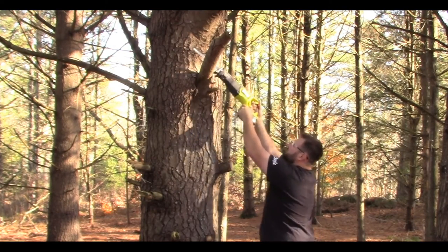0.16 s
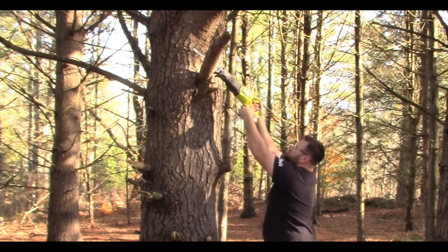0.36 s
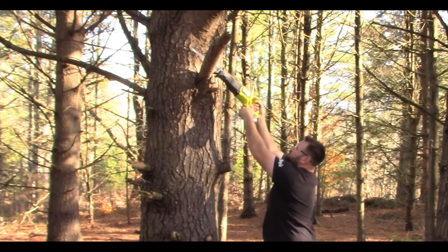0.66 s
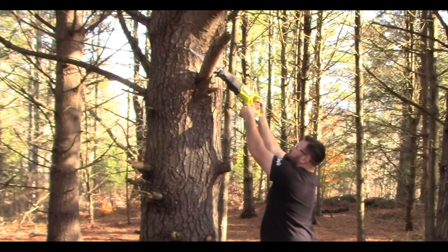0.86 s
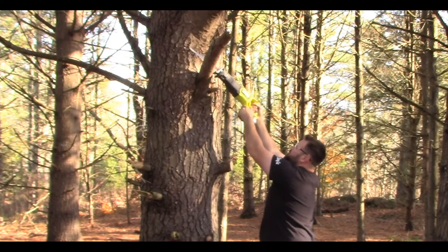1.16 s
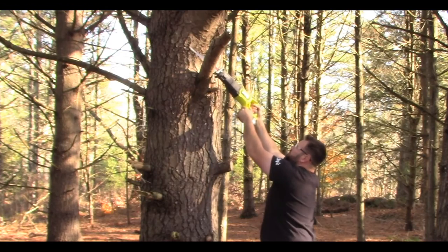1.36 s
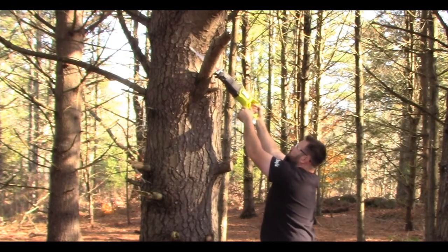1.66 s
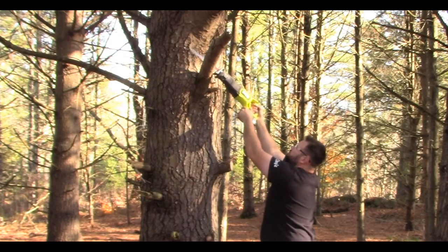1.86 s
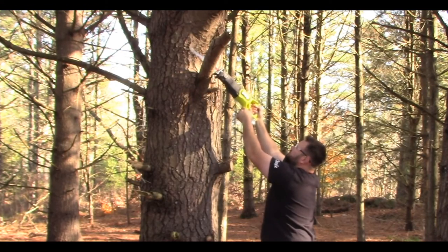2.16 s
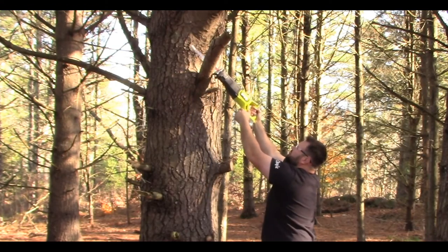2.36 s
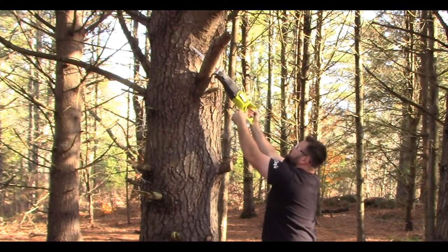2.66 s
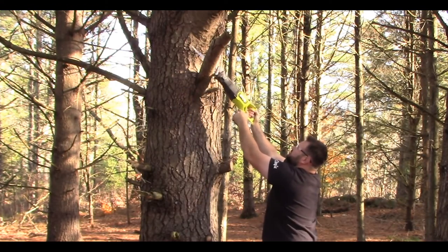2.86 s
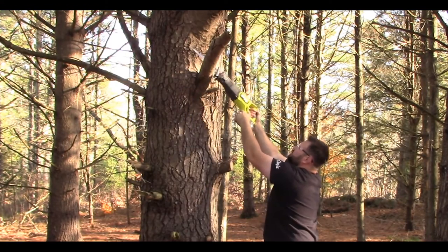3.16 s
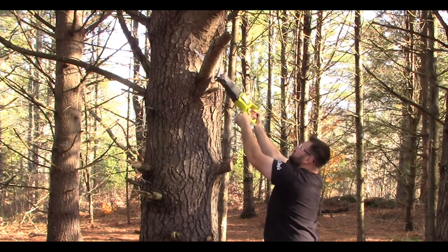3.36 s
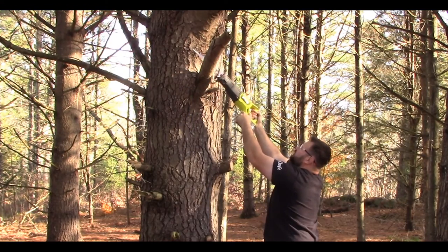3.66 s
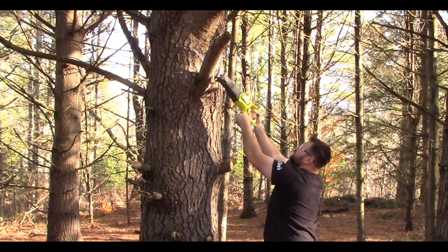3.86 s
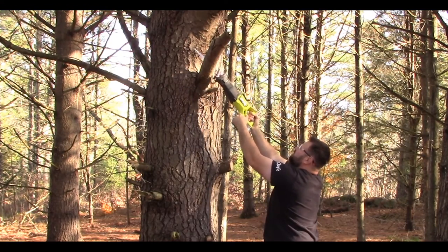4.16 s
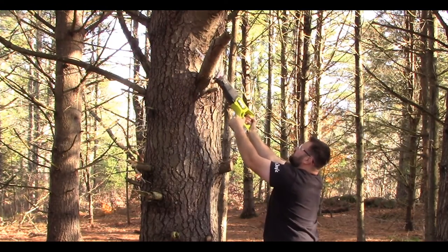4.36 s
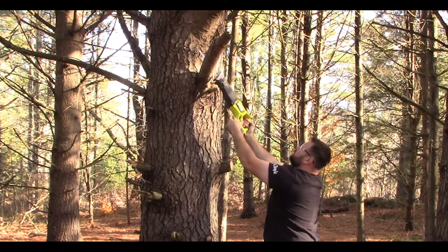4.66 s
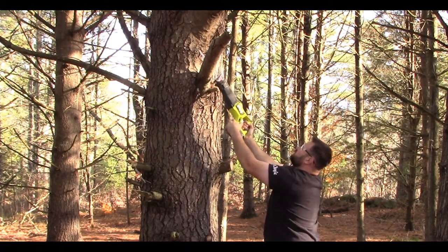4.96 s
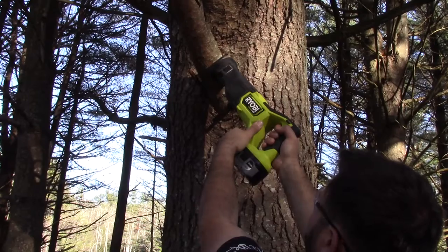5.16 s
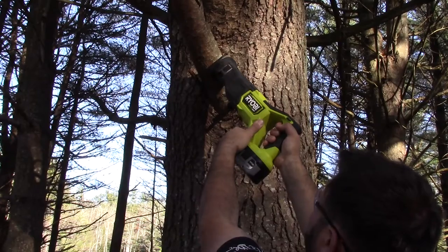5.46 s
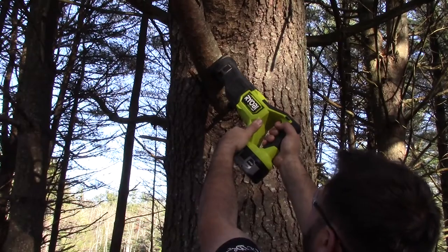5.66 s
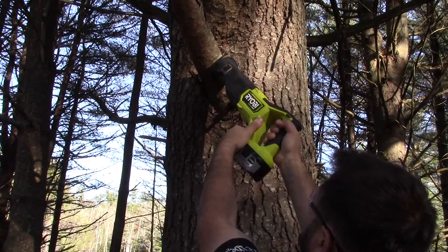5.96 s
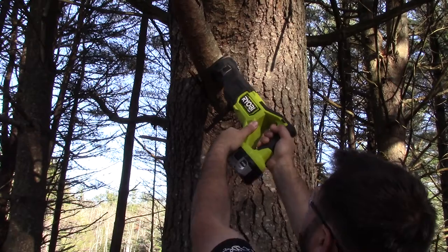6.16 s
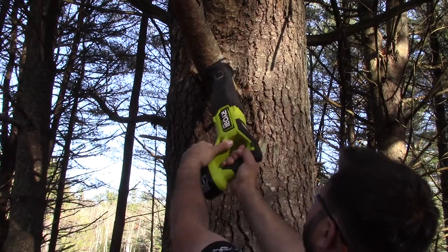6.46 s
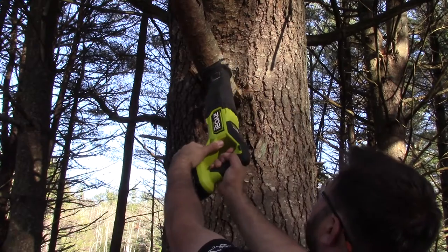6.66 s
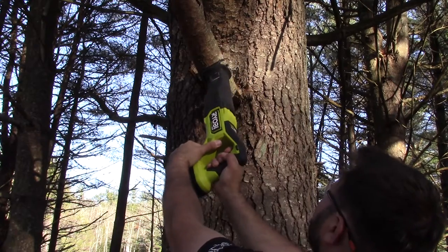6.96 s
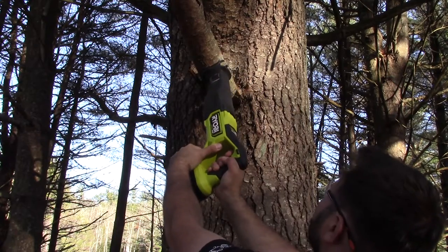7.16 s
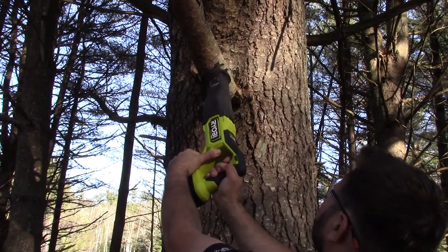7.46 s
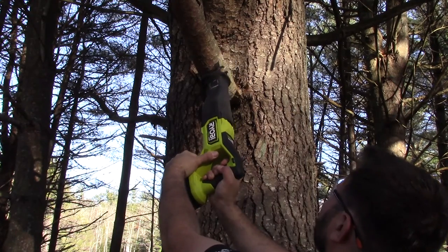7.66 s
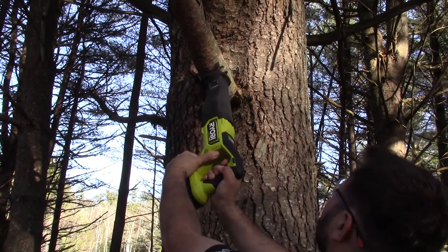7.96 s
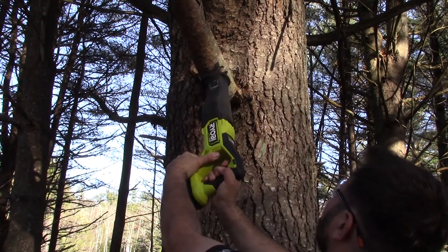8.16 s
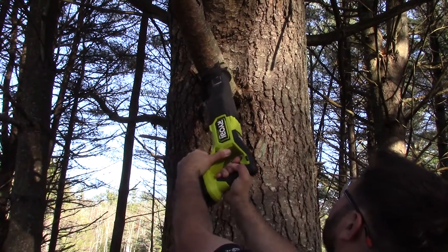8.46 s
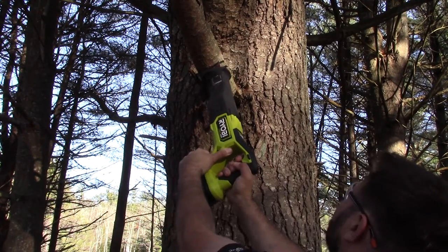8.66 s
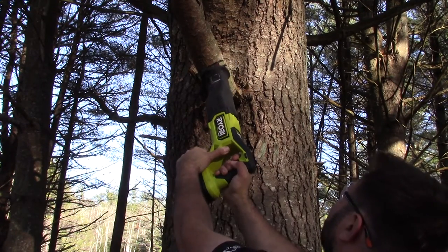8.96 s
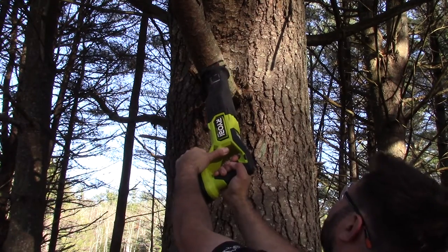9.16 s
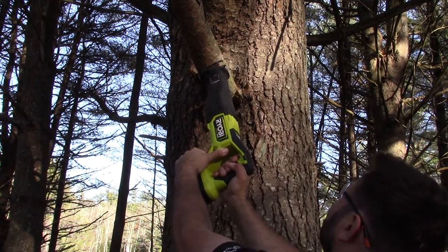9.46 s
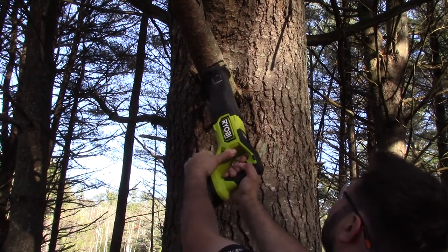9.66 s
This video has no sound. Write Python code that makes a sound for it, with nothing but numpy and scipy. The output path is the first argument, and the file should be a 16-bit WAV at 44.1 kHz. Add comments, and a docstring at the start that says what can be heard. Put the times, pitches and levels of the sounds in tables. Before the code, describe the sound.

A cordless reciprocating saw starts up and cuts steadily through a fresh tree limb, with fast rattling hammering, motor whine and rasping teeth.

```python
"""A fast, rattling hammer with a rasp on top: a cordless reciprocating saw cuts a fresh pine limb in a
quiet wood, first from afar, then from close by. One crank drives it all: the blade carrier knocks at both
ends of its stroke, the guide rattles, the gears sing between the knocks, the motor fan whines and the
teeth rasp. Load in the cut sags the speed. The cut has four stages: entry and deep in the limb (far),
then with the saw held flat and tilted steep (close)."""
import sys
import numpy as np
from scipy import signal
from scipy.fft import rfft, irfft
from scipy.io import wavfile

SR = 44100
rng = np.random.default_rng(int(sys.argv[2]) if len(sys.argv) > 2 else 0)


def wav_record(signal):
    """Record a signal, one row per channel, as 16-bit PCM in the file named by sys.argv[1]."""
    frames = np.transpose(np.atleast_2d(signal))
    bounded = np.clip(frames, -1, 1)
    # unit amplitude maps onto the largest positive 16-bit level
    quanta = np.round(bounded * 32767).astype(np.int16)
    wavfile.write(sys.argv[1], SR, quanta)


N = 432180
T = np.arange(N) / SR


def knocks(turns, outer, inner, lean_db, lead_turns=0.06115, ring_hz=1500, ring_width_hz=330):
    """The slack in the drive slaps shut at each end of the stroke; the outer blow rings the case longer."""
    # tone of the gear case: freq_hz, gain_db
    case_eq = [(200, -37), (400, -27.5), (700, -12.5), (1150, -11), (1300, -8), (1430, 1), (1620, -0.5),
               (1760, -5), (1900, -22), (2800, -43.5), (6000, -64)]
    pole = np.exp((2j * np.pi * ring_hz - np.pi * ring_width_hz) / SR)
    outer_clicks = strike(turns + lead_turns - outer, jitter_s=0.00031, spread_db=1)
    outer_ring = signal.lfilter([1], [1, -pole], outer_clicks).real
    inner_clicks = strike(turns + lead_turns - inner, jitter_s=0.00034, spread_db=1.5)
    share = 1 / (1 + amp(-2 * lean_db))  # the outer knock's part of the power
    return np.sqrt(share) * colour(outer_ring, case_eq) + np.sqrt(1 - share) * colour(inner_clicks, case_eq)


def rattle(angle, force_db, grip, loose=0.85, count=28, close_s=5.045):
    """Shoe, guide and teeth catch at the same places in every stroke; loose chatter fills the gaps."""
    # tone of the rattle from afar and from close by: freq_hz, gain_db
    far_eq = [(60, -34.5), (160, -19), (290, -16.5), (390, -4.5), (520, -4), (660, -2), (900, 1),
              (1200, -1.5), (1700, 6.5), (1920, -11.5), (2200, -13), (2500, -18), (2950, -38),
              (6000, -49.5)]
    close_eq = [(60, -38.5), (170, -26.5), (300, -19.5), (430, -2.5), (530, -6.5), (670, -1.5), (850, -6),
                (1200, -0.5), (1600, 5), (1920, -12), (2200, -16.5), (2500, -14), (2950, -32.5),
                (6000, -41)]
    places = (np.arange(count) + rng.random(count)) / count
    catches = sum(rng.choice([-1, 1]) * strike(angle - p, jitter_s=.00009, spread_db=1.5) for p in places)
    slap = strike(angle + 0.013, jitter_s=0.00025, spread_db=-0.5)  # the shoe hits the bark once a stroke
    chatter = (grip * evened(catches) + loose * rng.standard_normal(N)) / np.hypot(grip, loose)
    drive = chatter * amp(force_db) + 0.18 * evened(slap)
    return np.where(T < close_s, amp(1.2) * colour(drive, far_eq), amp(0.8) * colour(drive, close_eq))


def buzz(angle, speed, scatter_rad=0.97, slip_turns=0.0012, swell_db=1.5, hop=200):
    """Each stroke's jolt drives a comb of harmonics; they swell as they slide into resonances."""
    # resonances of housing and limb: centre_hz, width_hz, entry_db, deep_db, flat_db, steep_db
    body = [(109, 90, -42, -51, -44, -47), (210, 56, -47, -44, -45.5, -45.5),
            (368, 43, -53, -33.5, -41, -47), (440, 70, -34, -32.5, -29.5, -33),
            (492, 30, -41, -33, -46, -50), (548, 54, -31.5, -36.5, -44, -49),
            (613, 43, -39, -28.5, -24.5, -28), (686.3, 51, -33, -28.5, -24, -27),
            (737, 40, -41, -31, -36, -29), (837, 39, -31, -40, -33.5, -29), (930, 95, -35, -35.5, -39, -35)]
    angle = angle + slip_turns * wander(20)
    swells = [amp(swell_db * wander(3)) for _ in range(5)]
    modes = [(hz, width, amp(by_stage(db)[::hop])) for hz, width, *db in body]
    comb = np.zeros(N)
    for k in range(2, 24):
        pitch_hz = k * speed[::hop]
        power = sum((peak / (1 + (2 * (pitch_hz - hz) / width) ** 2)) ** 2 for hz, width, peak in modes)
        gain = np.interp(T, T[::hop], np.sqrt(power)) * swells[k % len(swells)]
        comb += gain * np.cos(2 * np.pi * k * angle + scatter_rad * rng.standard_normal())
    return np.sqrt(2) * np.minimum(speed / 40, 1) ** 4 * comb


def gears(turns, outer, inner, level_db, crown_teeth, drag_rad=1.8, waver_rad=0.13, slack_turns=0.077):
    """The teeth sing while loaded, fall behind through each half stroke and let go at the reversal."""
    since, split = (turns - outer) % 1, inner - outer
    half_stroke = np.where(since < split, since / split, (since - split) / (1 - split))
    contact = abs(np.sin(np.pi * half_stroke)) ** 0.42 * amp(0.32 * wander(80))
    from_parting = (since + 0.053 + .5) % 1 - .5  # they part longest just before the outer knock
    contact *= 1 - np.exp(-(from_parting / slack_turns) ** 2)
    mesh = 2 * np.pi * crown_teeth * turns - drag_rad * half_stroke + waver_rad * wander(47)
    gear_eq = [(600, 3.5), (1400, -1.5), (1800, -4.5), (1950, -12), (2200, -14), (4000, -44.5)]
    return amp(level_db) * colour(contact * np.sin(mesh), gear_eq)


def motor(turns, inner, gear_ratio, blades, grip, fan_db, spin_up, sway_rad=0.056, flutter_rad=0.024):
    """Fan whine and overtones of a shaft that each stroke slows and frees again."""
    # motor overtones: shaft_multiple, entry_db, deep_db, flat_db, steep_db
    partials = [(12, -48, -52, -48, -53), (16, -46.5, -43.5, -50, -42), (18, -45.5, -54, -45.5, -48),
                (19, -55, -50, -59.5, -50), (20, -47, -50, -48.5, -48), (24, -45, -54, -49, -45.5),
                (28, -54, -60, -53, -50), (32, -51, -54, -52, -67), (39, -58, -56, -58, -58),
                (40, -60, -58, -49.5, -48)]
    crank = 2 * np.pi * (turns - inner)
    lurch = sway_rad * np.cos(crank) + 0.034 * np.sin(2 * crank)
    shaft = 2 * np.pi * turns * gear_ratio + lurch + flutter_rad * wander(43)
    fan = grip * amp(fan_db + .5 * wander(33)) * np.sin(blades * shaft)
    shaft = shaft + (0.01 + .06 * (1 - grip)) * wander(85)  # a bouncing saw roughens the overtones
    overtones = sum(by_stage(amp(db)) * amp(1.7 * wander(3)) * np.sin(k * shaft) for k, *db in partials)
    return np.sqrt(2) * (fan + spin_up * overtones)


def vents(fan_hz, centre_hz, width_hz=230):
    """Gain in dB: the fan whine is loudest where it meets the resonance of the vents."""
    return -10 * np.log10(1 + (2 * (fan_hz - centre_hz) / width_hz) ** 2)


def rasp(force_db, grain_db=4.0, grains_per_s=6000):
    """Teeth tear the fibres in tiny snaps; the colour shifts as the blade sinks and tilts."""
    # tone of the tearing wood in each stage: freq_hz, gain_db
    entry_eq = [(1650, -47), (2800, 0), (2970, -2.5), (3330, 2), (3840, 0.5), (4630, -6.5), (5080, -4.5),
                (5380, -3.5), (8100, -1.5), (9150, -3.5), (10600, -11), (13700, -14.5), (15600, -23)]
    deep_eq = [(1650, -31), (2800, -1), (3650, 2), (4250, -4.5), (4760, -1), (6720, -2.5), (7270, 0.5),
               (7700, -3.5), (8830, -8), (10100, -8.5), (11900, -8), (13600, -13.5), (15600, -25)]
    flat_eq = [(1650, -46), (2800, -6.5), (3790, 1.5), (4220, -8), (5010, -13), (5380, -7.5), (6080, -8),
               (6300, -10), (7170, -10.5), (11100, -16), (12300, -15), (14300, -18), (15600, -36)]
    steep_eq = [(1650, -38), (2800, -2), (3120, -1), (3700, 3), (4310, -3), (4630, -2.5), (5270, 1),
                (5910, -3.5), (7120, -5.5), (7590, -6.5), (8770, -8), (9980, -6.5), (11800, -4),
                (14000, -13.5), (15600, -42)]
    size = amp(grain_db * np.minimum(rng.exponential(1, N), 4) + 2 * wander(200))  # snaps come in clumps
    snaps = (rng.random(N) < grains_per_s / SR) * rng.uniform(-0.94, 1, N) * size
    bright_snaps = evened(np.diff(snaps, prepend=0))
    rubbing = 0.94 * rng.standard_normal(N)
    drive = (bright_snaps + rubbing) * amp(force_db + 0.79 * wander(80))
    return by_stage([colour(drive, eq) for eq in (entry_eq, deep_eq, flat_eq, steep_eq)])


def shake(turns):
    """The swinging mass pumps the saw and the limb at the stroke rate."""
    return np.sqrt(2) * np.sin(2 * np.pi * turns) * amp(.4 * wander(20))


def blade_squeal(force_db, fade_s=0.093):
    """Rubbing keeps narrow resonances of the steel ringing."""
    # squeals in the cut: start_s, end_s, pitch_hz, width_hz, level_db
    squeals = [(2.36, 2.77, 8320, 400, -36), (2.7, 4.3, 8660, 900, -40.5), (4.25, 5.08, 7200, 200, -37),
               (6.2, 7.5, 3640, 500, -40.5), (7.454, 8.3, 5270, 170, -39), (7.5, 8.3, 9400, 220, -43),
               (6.902, 9.7, 11250, 1100, -42.5)]
    steel = np.zeros(N)
    for start, end, hz, width, db in squeals:
        gate = np.clip(np.minimum(T - start, end - T) / fade_s, 0, 1)
        ring = ((wander(width / 2) + 1j * wander(width / 2)) * np.exp(2j * np.pi * hz * T)).real
        steel += amp(db) * gate * evened(ring * amp(force_db))
    return steel


def trigger_whistle(speed, chop_hz=9900, split_per_turn=30, whistle_db=-54):
    """The speed control whistles briefly at part throttle; the turning commutator splits the tone in two."""
    gate = np.interp(T, [.46, .48, .58, .68], [0, 1, 1, 0])
    pitches_hz = [chop_hz + side * split_per_turn * speed for side in (-1, 1)]
    return amp(whistle_db) * gate * sum(np.sin(2 * np.pi * np.cumsum(hz) / SR) for hz in pitches_hz)


def pinch(rise_s=0.63, release_s=0.024):
    """Level rides in dB while the wood squeezes the blade: slow to build, quick to let go."""
    # the cut closes on the blade: start_s, end_s, rasp_db, shake_db, gears_db, knock_db
    pinches = [(3.95, 5.054, 2, -7.5, -13, 1), (7.1, 8.35, 1.5, 0.5, 0, -2.5),
               (9.0, 9.683, 2.2, -1, 1.5, 0.5)]
    return sum(np.outer(db, np.clip(np.minimum((T - start) / rise_s, (end - T) / release_s), 0, 1))
               for start, end, *db in pinches)


def surges(angle, delay, rise, fall, inner_db, outer_db, floor_db):
    """Force in dB: it jumps each time the blade turns round, then eases. Timings are in turns."""
    def swell(at):
        since = (angle - at + .5) % 1 - .5
        return np.exp(-(since / np.where(since < 0, rise, fall)) ** 2)
    return floor_db + inner_db * swell(delay) + outer_db * swell(delay + .5)


def trunks(x, t60_s=0.43, wet_db=-13):
    """The trunks scatter a thin tail of echoes."""
    t = T[:SR // 2]
    taps = rng.standard_normal(len(t)) * (rng.random(len(t)) < .04) * (t > .006) * amp(-60 * t / t60_s)
    tail = signal.oaconvolve(x, taps / np.linalg.norm(taps))[:N]
    return x + amp(wet_db) * tail


def woods(air_db=-53, hum_hz=77, hum_db=-55):
    """Faint air in the trees and a low distant hum."""
    # tone of the air: freq_hz, gain_db
    air_eq = [(15, -41), (25, -7), (49, -10), (86, -1.5), (99, -11), (113, -10), (188, -27), (240, -18),
              (350, -18), (743, -14.5), (1460, -24), (11000, -28), (15600, -30)]
    air = amp(air_db) * colour(rng.standard_normal(N), air_eq)
    return air + amp(hum_db + wander(4)) * np.sin(2 * np.pi * hum_hz * T)


def by_stage(values):
    """Crossfades between four numbers or signals, one for each stage of the cut."""
    # course of the cut: time_s, stage (0 entry, 1 deep, 2 flat, 3 steep)
    stages = [(2.6, 0), (3.0, 1), (5.035, 1), (5.045, 2), (6.15, 2), (6.5, 3)]
    times, order = zip(*stages)
    if np.ndim(values[0]) == 0:
        return np.interp(T, times, [values[k] for k in order])
    stage = np.interp(T, times, order)
    return sum(np.maximum(1 - abs(stage - k), 0) * v for k, v in enumerate(values))


def strike(angle, jitter_s, spread_db):
    """One click at each whole turn of the angle, a little uneven in time and size."""
    at = np.flatnonzero(np.diff(np.floor(angle)) > 0)
    late, size = rng.standard_normal((512, 2))[:len(at)].T
    at = np.clip(np.round(at + late * jitter_s * SR).astype(int), 0, N - 1)
    return np.bincount(at, amp(spread_db * size), N)


def colour(x, eq, size=4096):
    """Causal EQ through (freq_hz, gain_db) points; the result has unit power."""
    hz, db = np.transpose(eq)
    log_gain = np.log(amp(np.interp(np.log(abs(np.fft.fftfreq(size, 1 / SR)) + 1), np.log(hz), db)))
    response = np.fft.ifft(np.exp(np.conj(signal.hilbert(log_gain)))).real[:size // 2]
    return evened(signal.oaconvolve(x, response)[:N])


def wander(hz, hop=12):
    """Random drift of unit power, rolled off above hz."""
    rolloff = 1 + (np.fft.rfftfreq(N // hop, hop / SR) / hz) ** 4
    slow = irfft(rfft(rng.standard_normal(N // hop)) / rolloff)
    return evened(np.interp(np.arange(N) / hop, np.arange(len(slow)), slow))


def evened(x):
    return x / np.sqrt(np.mean(x ** 2) + 1e-20)


def amp(db):
    return 10 ** (np.asarray(db) / 20)


def scene(start_s=.47, run_up_s=.24, settle_s=.26, sink_s=.89, free_hz=46.9, inner=.6):
    """The saw runs up and cuts; the sag of its speed sets load and grip, the stage sets the balance."""
    # crank speed once running, sagging as the saw is pressed: time_s, stroke_hz
    stroke_rates = [(0.72, 44.53), (1.24, 44.67), (1.55, 42.68), (1.8, 42.42), (2.13, 43.33), (2.55, 46.65),
                    (2.75, 45.05), (2.95, 41.16), (3.11, 40.12), (3.92, 41.72), (5.91, 40.72),
                    (6.12, 41.09), (6.4, 39.07), (6.98, 40.94), (7.63, 39.44), (8.07, 39.97), (8.35, 39.58),
                    (8.6, 40.96), (9.4, 40.24), (9.8, 38.87)]
    # mix, a row per stage: knock_db, rattle_db, rasp_db, shake_db, gears_db, fan_db
    mix = [(-17, -16.5, -32, -32, -24, -24.5), (-15.5, -17.5, -32, -35.5, -31.5, -22.5),
           (-14.5, -16.5, -33.5, -30.8, -30, -21.5), (-16.5, -16.5, -32, -34, -28, -32)]
    # the drive, a row per stage: inner_to_outer_turns, outer_over_inner_db, vent_hz
    drive = [(.56, -5.5, 2450), (.57, 7.5, 2497), (.58, 6, 2543), (.53, -5, 2345)]
    crown_teeth, pinion_teeth, fan_blades = 44, 6, 8
    gear_ratio = crown_teeth / pinion_teeth
    cruise = np.interp(T, *np.transpose(stroke_rates))
    elapsed = np.maximum(T - start_s, 0)
    run_up = elapsed / run_up_s
    speed = cruise * run_up / (1 + run_up ** 12) ** (1 / 12)
    turns = np.cumsum(speed) / SR
    sag_hz = free_hz - cruise
    load = sag_hz / 8
    grip = np.clip(sag_hz / 3.3, 0.26, 1)  # when the shoe lifts, the clean tones dissolve
    spin_up = np.clip(elapsed / settle_s, 0, 1)
    at_rest = 1 - spin_up  # each layer swells in from its own depth

    gap, lean_db, vent_hz = map(by_stage, zip(*drive))
    outer, angle = inner + gap - 1, turns - inner  # inner and outer place the two knocks, in crank turns
    press_db = surges(angle, delay=.061, rise=.061, fall=.074, inner_db=8, outer_db=4.4, floor_db=.2)
    bite_db = surges(angle, delay=.022, rise=.038, fall=.13, inner_db=7, outer_db=1.3, floor_db=2.3)

    knock_db, rattle_db, rasp_db, shake_db, gears_db, fan_db = map(by_stage, zip(*mix))
    pinch_rasp, pinch_shake, pinch_gears, pinch_knock = pinch()
    knock_db += pinch_knock - 48 * at_rest
    knock_db -= 19 * np.exp(-elapsed / sink_s)  # soft until the blade has sunk in
    knock_db -= 1.5 * (1.5 - grip)  # softer when the shoe lifts
    rattle_db -= 26 * at_rest
    rasp_db += pinch_rasp - 20.5 * at_rest
    shake_db += pinch_shake - 37 * at_rest
    gears_db += 18 * load ** 2 + pinch_gears - 39 * at_rest
    fan_db += vents(speed * gear_ratio * fan_blades, vent_hz) - 29 * at_rest

    saw = amp(knock_db) * knocks(turns, outer, inner, lean_db)
    saw += amp(rattle_db) * rattle(angle, press_db, grip) + grip * buzz(angle - .03, speed)
    saw += amp(rasp_db) * rasp(bite_db) + blade_squeal(bite_db)
    saw += grip * gears(turns, outer, inner, gears_db, crown_teeth)
    saw += motor(turns, inner, gear_ratio, fan_blades, grip, fan_db, spin_up) + trigger_whistle(speed)
    pumping = np.sqrt(grip) * amp(shake_db) * shake(turns)
    running = np.clip((T - .46) / 0.038, 0, 1)
    return (trunks(running * saw) + running * pumping + woods())[None]


def record(dry, ceiling=0.93, cutoff_hz=15750):
    """A soft clip rounds the loudest peaks; a steep low-pass trims the top."""
    rounded = dry / (1 + (dry / ceiling) ** 6) ** (1 / 6)
    lowpass = signal.firwin(511, cutoff_hz, window=("kaiser", 9), fs=SR)
    return signal.oaconvolve(rounded, lowpass[None], "same")


dry = scene()
out = record(dry)
wav_record(out)
```